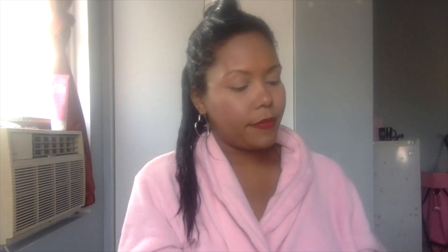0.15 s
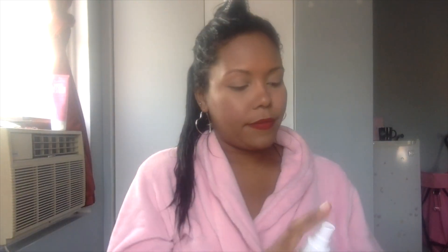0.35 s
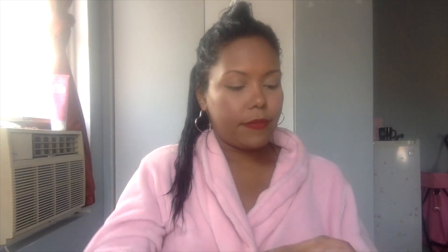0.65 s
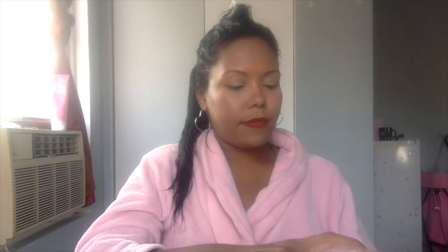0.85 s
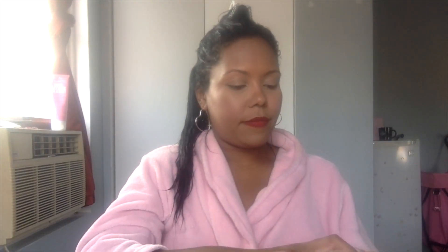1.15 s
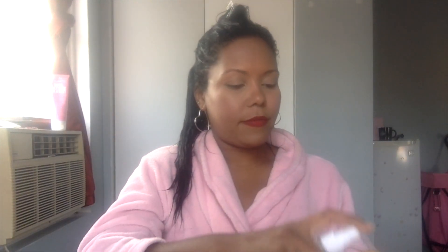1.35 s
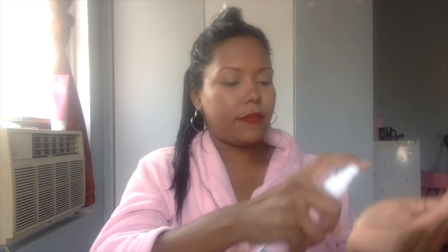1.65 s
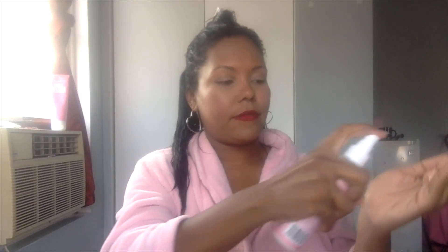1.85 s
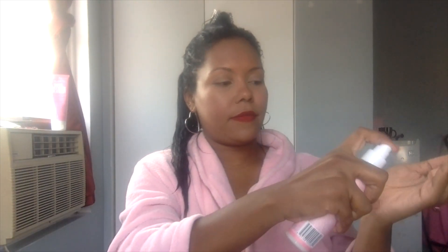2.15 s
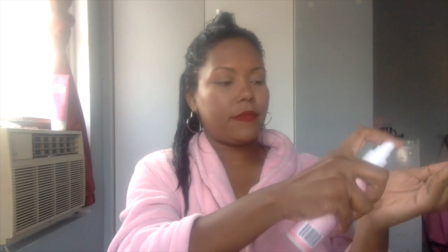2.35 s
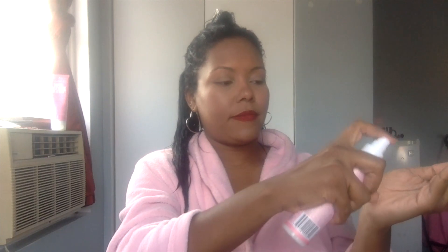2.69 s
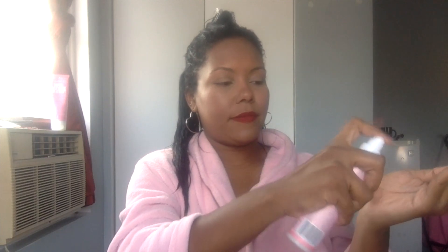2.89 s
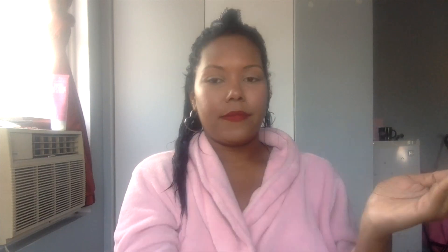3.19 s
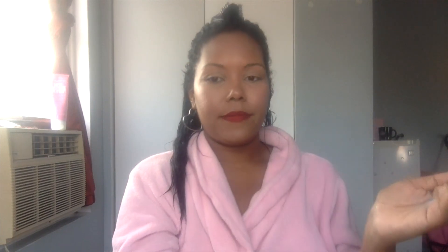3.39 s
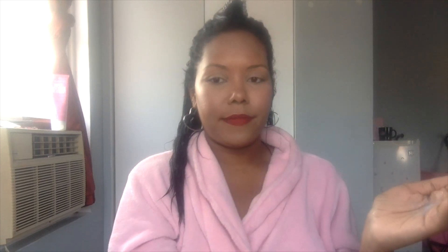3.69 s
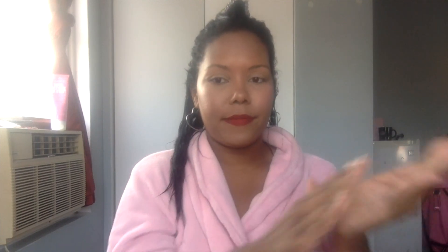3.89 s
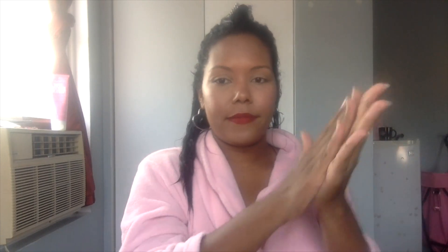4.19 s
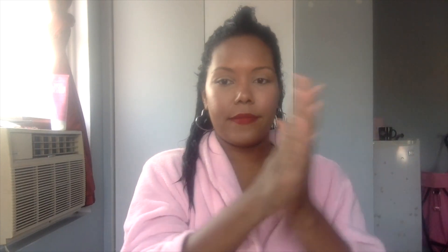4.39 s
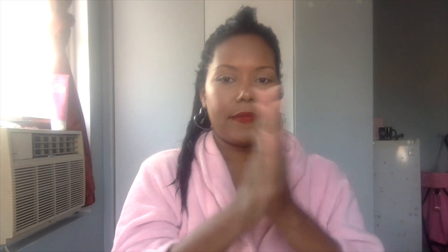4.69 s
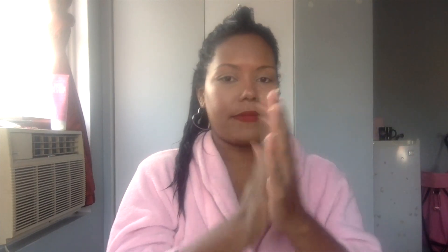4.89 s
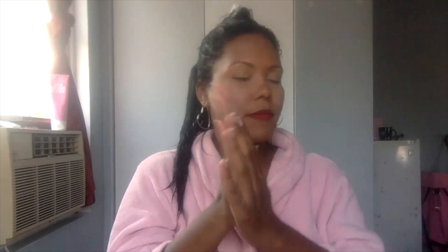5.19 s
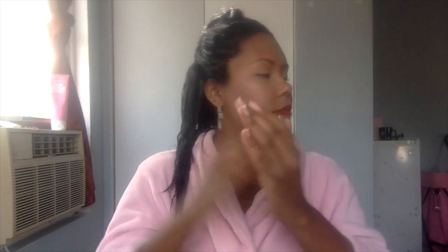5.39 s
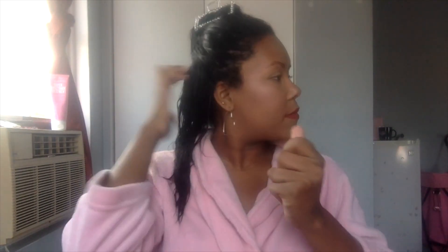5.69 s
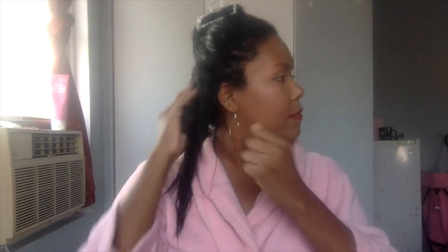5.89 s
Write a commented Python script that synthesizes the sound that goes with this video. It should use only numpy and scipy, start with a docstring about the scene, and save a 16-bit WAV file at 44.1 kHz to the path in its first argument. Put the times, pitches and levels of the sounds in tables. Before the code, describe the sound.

A plastic pump bottle clicks and bumps as it is picked up. It sprays three short, fizzy hisses into a palm, then is set down with a hard knock that rings through the table holding the microphone. Wet hands rub together with a squelch and two sharp smacks. Thin, high chirps like a small bird's continue throughout the small, quiet room, over a faint rush and hum.

```python
"""A pump bottle clicks and bumps as it is picked up in a small, quiet room. It sprays three short
hisses of air and liquid into a palm, then is set down hard, ringing the table that carries the
microphone. Wet hands rub and smack together, squeezing out liquid and popping pockets of air.
Thin falling chips, like those of a small bird, go on throughout over a faint rush and hum."""
import sys
import numpy as np
from scipy import signal
from scipy.fft import rfft, irfft, next_fast_len
from scipy.io import wavfile
from scipy.ndimage import uniform_filter1d, map_coordinates

SR = 44100
rng = np.random.default_rng(int(sys.argv[2]) if len(sys.argv) > 2 else 0)


def store_pcm(level_fs):
    """Save levels as 16-bit WAV."""
    pcm = np.round(np.clip(level_fs, -1, 1) * 32767).astype(np.int16)
    wavfile.write(sys.argv[1], SR, np.atleast_2d(pcm).T)


N = 266805
TIME = np.arange(N) / SR
AGE = np.arange(SR // 2) / SR  # seconds since an event began

# The room's echo. Each row: frequency in Hz, seconds to fade 60 dB before `linger` scales them.
ROOM_DECAY = [(100, 0.37), (400, 0.2), (1300, 0.32), (3500, 0.33), (7000, 0.39), (11000, 0.18),
              (15000, 0.17)]
# Echoes off near surfaces. Each row: delay in seconds, level in dB.
WALL_ECHOES = [(.0025, -14), (.0086, -20.5), (0.0117, -10.5), (0.028, -16)]

# The tone colours of the noises. Each row: frequency in Hz, relative level in dB.
AIR_COLOUR = [(15, -72), (25, -42.5), (64, -22.5), (74, -23), (97, -3.5), (137, -19.5), (206, -15),
              (317, -9), (354, -18), (775, -21.5), (988, -15.5), (1520, -20.5), (1940, -27), (2990, -24.5),
              (16000, -41)]  # the quiet room
RUMBLE_COLOUR = [(25, -30), (60, -12.5), (100, 13.5), (150, 0), (220, -32), (330, 7.5), (800, -31),
                 (4000, -84)]  # dull rumbles through the table
SKIN_COLOUR = [(400, -25), (1900, -16), (3000, 0.5), (4200, -1), (6000, 3), (8500, -5.5), (10500, -22.5),
               (15000, -29)]  # sliding skin
SQUELCH_COLOUR = [(250, -27), (600, 0.5), (1000, 6.5), (1700, -5), (2800, 3.5), (4200, 0.5), (5600, -16),
                  (8000, -8), (11500, -25), (14500, -29)]  # squeezed liquid
CRACK_COLOUR = [(60, -18.5), (300, 6), (1000, 0), (1800, -11), (2800, -5), (4200, -10.5), (5300, -16),
                (9000, -21), (15000, -31.5)]  # the bottle hitting the table
FIZZ_COLOUR = [(800, -63.5), (3000, -21.5), (5200, -14.5), (7000, 4), (10000, -2.5), (13000, -6),
               (15500, -4.5)]  # droplets at the nozzle
JET_COLOUR = [(300, -59), (900, -13.5), (1800, -14), (2700, -1), (4500, 3.5), (6000, -6.5), (9000, -17)]  # mist meeting the palm
SPIT_COLOUR = [(1000, -83.5), (2200, -65), (3000, -0.5), (4200, -33), (7300, 4.5), (8700, -4), (11500, 1.5),
               (14300, 0.5), (16000, -1)]  # the nozzle spitting

# Clear chips. Each row: start in seconds, peak in dB, pitch partway down in Hz, rough length in seconds.
CLEAR_CHIPS = [(0.1485, -37.5, 5110, 0.016), (0.3725, -37.5, 4910, 0.011), (0.6632, -50, 6240, 0.014),
               (1.273, -42, 4740, 0.019), (1.469, -38, 6340, 0.013), (1.5717, -37.5, 6280, 0.015),
               (1.7817, -45, 6020, 0.016), (1.8778, -33.5, 6020, 0.011), (2.385, -29, 5800, 0.016),
               (2.5397, -23.5, 5830, 0.01), (2.615, -28, 6230, 0.017), (2.747, -26, 5810, 0.016),
               (2.9831, -28.5, 5940, 0.013), (3.074, -28.5, 6020, 0.014), (3.2265, -30.5, 5540, 0.016),
               (3.3738, -32.5, 5830, 0.0095), (3.56, -28, 6060, 0.014), (3.7193, -32.5, 5590, 0.011),
               (3.788, -24.5, 6360, 0.013), (3.813, -39, 6190, 0.01), (3.8656, -37, 5620, 0.013),
               (3.91, -22.5, 6020, 0.015), (4.0127, -37.5, 5160, 0.016), (4.0543, -33, 5330, 0.014),
               (4.187, -32, 5970, 0.012), (4.2672, -29.5, 6780, 0.011), (4.349, -43, 5410, 0.014),
               (4.4017, -30, 6010, 0.02), (4.734, -27.5, 6610, 0.017), (4.9875, -31, 6290, 0.02),
               (5.0797, -30, 6830, 0.011), (5.221, -31, 6010, 0.015), (5.373, -43, 5570, 0.011),
               (5.442, -24, 6480, 0.012), (5.5593, -28, 6337, 0.013), (5.8684, -47, 5660, 0.011),
               (5.939, -39, 6540, 0.0096)]
# A thin held note. Each row: time in seconds, pitch in Hz, level in dB.
WHISTLE_PATH = [(3.48, 7750, -54), (3.6, 7350, -48), (3.636, 7450, -52), (3.654, 7520, -49),
                (3.68, 7410, -63), (3.735, 7540, -57)]

# Movements that swell and fade. Each row: middle in seconds, level in dB, half length in seconds.
TABLE_RUMBLES = [(.095, -30.5, 0.017), (.13, -36, 0.035), (1.2, -72.5, 0.2), (1.83, -63.5, 0.022),
                 (2.39, -63, 0.08)]  # the bottle scrapes as it is lifted, then arms shift faintly
SKIN_RUBS = [(.105, -55, 0.045), (4.09, -62, 0.086), (4.44, -43, 0.034), (4.98, -45.5, 0.02135),
             (5.13, -52.5, 0.05), (5.33, -64, 0.072)]  # skin slides on the bottle, then palm on palm
SQUEEZES = [(4.949, -29.5, 0.0034), (4.962, -32, 0.0069), (4.975, -32, 0.0063), (4.99, -44, 0.025)]  # liquid is squeezed between the palms
# Air bursts from cupped palms. Each row: start in seconds, peak in dB, pitch factor, treble limit in Hz.
PALM_POPS = [(4.5784, -18, 0.99, 6945), (4.5813, 0, 1.003, 15000), (5.3471, -31.5, 1.145, 3120)]
# Sharp clicks. Each row: start in seconds, peak in dB, centre frequency in Hz, width in octaves.
PALM_SMACKS = [(4.8628, -0.5, 3940, 0.61), (4.947, -22.5, 2780, 0.21), (4.973, -17.5, 2680, 0.55),
               (5.177, -40.5, 990, .7), (5.279, -31, 3220, .11), (5.281, -26.5, 2370, 0.61)]  # wet palms part and smack
PLASTIC_CLICKS = [(.0722, -18, 4600, 0.2), (.0725, -25, 9440, 0.54), (1.048, -45.5, 1330, 0.8),
                  (1.06, -50.5, 3100, 0.11), (1.311, -38.5, 6900, 0.22), (1.339, -33.5, 1760, 0.52),
                  (2.03, -45, 3100, .12), (2.044, -28.5, 3076, 0.077), (2.466, -47, 8900, 0.44),
                  (2.663, -38, 3060, 0.047), (2.671, -45, 8340, .28), (2.7035, -24.5, 4800, 0.11),
                  (3.104, -34, 8333, 0.3)]  # the bottle and its plunger

# Ringing tones. Each row: frequency in Hz, relative level in dB, seconds to fade 60 dB.
CUP_TONES = [(1010, -19, 0.006), (1301, -3.5, 0.021), (2615, -7, 0.014), (3195, -1, 0.014),
             (3533, -0.5, 0.022), (4250, -2.5, 0.0075), (6420, 1.5, 0.00442), (7240, -1, 0.014),
             (7780, -12, 0.0225), (8630, -7, 0.0076), (10000, -17, .007), (12380, -6.5, 0.0041)]  # air between the palms, before each pop's pitch factor
TABLE_TONES = [(99.8, -12, 0.094), (132.1, -12, 0.26), (187.4, -7.5, 0.12), (271.7, -4.5, 0.09),
               (354, -3, 0.062), (391.4, -6, 0.11), (593, -8.5, 0.043), (841.7, -8.5, 0.061),
               (1015, -20, 0.19), (1290, -20.5, 0.13), (2633, -23.5, 0.18), (2763, -24, 0.083)]  # the table top
# The bottle meets the table. Each row: start in seconds, thud in dB, crack in dB, treble limit in Hz.
BOTTLE_KNOCKS = [(0.073, -28, -44, 397), (0.086, -27, -53, 150), (0.0969, -27.5, -25.5, 605),
                 (0.1006, -21, -20.5, 570), (3.4084, -15.5, -6, 14000), (3.4103, 1.5, -11, 2400)]

# The nozzle's small hollows. Each row: frequency in Hz, width in Hz, boost or cut in dB.
NOZZLE_HOLLOWS = [(4900, 380, -3), (7180, 1000, 4), (8740, 490, -0.5), (9960, 520, 11), (12260, 600, 6),
                  (13400, 650, -10), (14200, 460, 9), (15041, 500, 10.5)]
# Spits of air and liquid. Each row: start in seconds, level in dB, seconds to fade 60 dB.
NOZZLE_SPITS = [(1.128, -31.5, 0.052), (2.0715, -19.5, 0.0068), (2.0831, -18, 0.019), (2.1256, -23, 0.023),
                (2.1781, -20.5, 0.047), (2.2271, -20.5, 0.018), (2.7026, -13, 0.018), (2.777, -17, 0.0026)]
# Pushes of the pump. Each row: start, length and rise time in seconds, fizz level and full jet level
# in dB, seconds the jet takes to build.
PUMP_STROKES = [(1.084, 0.15, 0.052, -37.5, -37, 0.083), (2.067, .19, 0.0093, -39.5, -51, 0.15),
                (2.704, 0.16, 0.0025, -39.5, -49, 0.036)]

AIR_DB, HUM_HZ, HUM_DB = -53.5, 85.6, -68  # levels before the noise suppressor
SUPPRESS_DB, OPEN_ABOVE_DB, OPEN_RANGE_DB = 12.5, -55, 20.5  # its depth; the treble levels that open it
OPEN_S, CLOSE_S = 0.1, 0.25
CHIP_ATTACK_S, CHIP_TAIL_DB = 0.0017, -26.5
CHIP_BASE_HZ, CHIP_START, CHIP_FALL = 4340, 1.238, 0.59  # scale on height above base; share lost per length
FAINT_CHIPS_PER_S, FAINT_CHIP_DB, FAINT_CHIP_HZ, FAINT_CHIP_S = 3, -50, 5600, 0.011
RUB_GRAIN_DB = 3
FIZZ_SAG_DB_PER_S, JET_BUILD_DB, RELEASE_DB_PER_S = 30, 24, 620
MIC_TOP_HZ = 16150


def amp(db):
    """Turn decibels into a gain."""
    return 10 ** (np.asarray(db) / 20)


def unit(x):
    """Scale x to an average (rms) level of 1."""
    return x / np.sqrt(np.mean(x ** 2) + 1e-20)


def along(points, hz):
    """Read between (Hz, value) points on a log frequency axis."""
    freqs, values = np.transpose(points)
    return np.interp(np.log(hz + 1), np.log(freqs + 1), values)


def add(track, start, sound):
    """Mix a sound into the track at a start time in seconds."""
    part = track[round(start * SR):][:len(sound)]
    part += sound[:len(part)]


def filtered(x, response):
    """Give each frequency in x the gain that response returns for it."""
    size = next_fast_len(len(x) + 8192)
    return irfft(rfft(x, size) * response(np.fft.rfftfreq(size, 1 / SR)), size)[:len(x)]


def high_pass(x, hz):
    """Turn down what lies below hz."""
    return signal.sosfilt(signal.butter(2, hz, "high", fs=SR, output="sos"), x)


def low_pass(x, hz):
    """Turn down what lies above hz."""
    return signal.sosfilt(signal.butter(2, min(hz, SR / 2 - 1), fs=SR, output="sos"), x)


def noise(colour, size=N):
    """Noise with the given tone colour, at level 1."""
    return unit(filtered(rng.standard_normal(size), lambda hz: amp(along(colour, hz))))


def wobble(rate):
    """A smooth curve through `rate` random points a second."""
    return map_coordinates(rng.standard_normal(int(N * rate / SR) + 4), [TIME * rate])


def swells(rows):
    """Smooth rises and falls in level, one for each row."""
    return sum(amp(db) * np.exp(-((TIME - middle) / half) ** 2) for middle, db, half in rows)


def fade(t60):
    """A level that drops 60 dB in t60 seconds."""
    return amp(-60 * AGE / t60)


def ring(tones, scatter_db):
    """Fading tones, struck at slightly new strengths each time."""
    return sum((-1) ** k * amp(db + scatter_db * rng.normal()) * fade(t60) * np.sin(2 * np.pi * hz * AGE)
               for k, (hz, db, t60) in enumerate(tones))


def in_room(x, wet_db, linger=1):
    """Add the room's echo, where each frequency dies at its own speed; linger scales its length."""
    hz, t, spectrum = signal.stft(rng.standard_normal(len(AGE)), SR, nperseg=256)
    t60 = linger * along(ROOM_DECAY, hz)[:, None]
    tail = signal.istft(spectrum * amp(-60 * t / t60), SR, nperseg=256)[1]
    tail = np.pad(tail / np.linalg.norm(tail), (SR // 400, 0))
    return x + amp(wet_db) * signal.fftconvolve(x, tail)[:len(x)]


def walls(x):
    """Near surfaces throw the sound back a moment later."""
    out = x.copy()
    for delay, db in WALL_ECHOES:
        add(out, delay, amp(db) * x)
    return out


def room_air():
    """A faint steady rush with a wavering low hum."""
    hum = amp(HUM_DB + 1.6 * wobble(8.2)) * np.sin(2 * np.pi * HUM_HZ * TIME + 3.6 * wobble(5.7))
    return amp(AIR_DB) * noise(AIR_COLOUR) + hum


def suppressor(x):
    """A noise suppressor's gain for the background: bright sound opens it, then it slowly closes."""
    treble_power = uniform_filter1d(high_pass(x, hz=6380) ** 2, size=SR // 50)
    treble_db = 10 * np.log10(np.abs(treble_power) + 1e-12)
    active = np.clip((treble_db - OPEN_ABOVE_DB) / OPEN_RANGE_DB, 0, 1)
    recently_active_s = signal.lfilter([1 / SR], [1, -np.exp(-1 / (CLOSE_S * SR))], active)
    return amp(-SUPPRESS_DB * np.exp(-recently_active_s / OPEN_S))


def chip(hz, length):
    """A pure tone that starts sharply and slides down; the higher it is, the faster it falls."""
    progress = AGE / length
    pitch = CHIP_BASE_HZ + (hz - CHIP_BASE_HZ) * CHIP_START * (1 - CHIP_FALL * np.minimum(progress, 2))
    decay = np.exp(-(progress / 0.76) ** 3) + amp(CHIP_TAIL_DB) * np.exp(-(progress / 1.6) ** 4)
    flutter = amp(2.5 * np.sin(2 * np.pi * (rng.uniform(80, 200) * AGE + rng.random())))
    level = (1 - np.exp(-(AGE / CHIP_ATTACK_S) ** 2)) * decay * flutter
    return level / level.max() * np.sin(2 * np.pi * np.cumsum(pitch) / SR)


def faint_chips():
    """Weak chips at random times, just above the room's rush."""
    out = np.zeros(N)
    for k, (when, loud, high) in enumerate(rng.random((int(FAINT_CHIPS_PER_S * N / SR), 3))):
        db = FAINT_CHIP_DB + 10 * (loud - 0.5)
        hz = FAINT_CHIP_HZ + 1600 * (high - 0.5)
        add(out, (k + when) / FAINT_CHIPS_PER_S, amp(db) * chip(hz, FAINT_CHIP_S))
    return out


def bird():
    """Clear chips and one thin, wavering whistle, like a small bird's."""
    chips = np.zeros(N)
    for start, db, hz, length in CLEAR_CHIPS:
        add(chips, start, amp(db) * chip(hz, length))
    times, hz, db = np.transpose(WHISTLE_PATH)
    pitch = np.interp(TIME, times, hz) + 70 * wobble(380)
    level = amp(np.interp(TIME, times, db, left=-120, right=-120) + 5.1 * wobble(92))
    whistle = level * np.sin(2 * np.pi * np.cumsum(pitch) / SR)
    return in_room(chips + whistle, wet_db=-13.5, linger=0.47)


def table_rumble():
    """Dull rumbles through the table: the bottle scrapes as it is lifted, then arms shift faintly."""
    return in_room(swells(TABLE_RUMBLES) * noise(RUMBLE_COLOUR), wet_db=-14)


def snap(hz, octaves):
    """A click of peak 1, made of one smooth hump of frequencies around hz."""
    size = len(AGE)
    away = np.log2((np.fft.rfftfreq(size, 1 / SR) + 1) / hz) / octaves
    hump = np.exp(-np.abs(away) ** 3.3 / 2) + amp(-70)
    # Keeping half the cepstrum (the log spectrum turned into time) packs the energy at the start.
    cepstrum = irfft(np.log(hump), size)
    click = irfft(np.exp(rfft(2 * cepstrum[:size // 2], size)), size)
    return click / np.abs(click).max()


def snaps(rows, wet_db):
    """Short clicks of plastic or wet skin, each with its own colour and echo."""
    out = np.zeros(N)
    for start, db, hz, octaves in rows:
        add(out, start, in_room(amp(db) * snap(hz, octaves), wet_db, linger=0.64))
    return out


def palms():
    """Wet skin swishes, films of liquid crackle, and trapped air pops in the hollow of the hands."""
    swish = swells(SKIN_RUBS) * unit(amp(RUB_GRAIN_DB * wobble(400)) * noise(SKIN_COLOUR))
    bubbles = rng.standard_normal(N) * amp(4.6 * wobble(1200))  # a few bursts stand far above the rest
    crackle = swells(SQUEEZES) * unit(filtered(bubbles, lambda hz: amp(along(SQUELCH_COLOUR, hz))))
    pops = np.zeros(N)
    for start, db, pitch, soft_hz in PALM_POPS:
        tones = [(hz * pitch, level, t60) for hz, level, t60 in CUP_TONES]
        pop = low_pass(ring(tones, scatter_db=0.5), soft_hz)
        pop = amp(db) * pop / np.abs(pop).max()
        add(pops, start, in_room(walls(pop), wet_db=-0.5, linger=0.92))
    pops = high_pass(high_pass(pops, hz=551.8), hz=404)
    return in_room(swish + crackle, wet_db=-9.5, linger=0.6) + pops


def knocks():
    """The bottle cracks against the table and rings its top; soft contacts lose their treble."""
    out = np.zeros(N)
    for start, thud_db, crack_db, soft_hz in BOTTLE_KNOCKS:
        thud = amp(thud_db) * ring(TABLE_TONES, scatter_db=1.56)
        crack = amp(crack_db) * fade(t60=0.0715) * noise(CRACK_COLOUR, size=len(AGE))
        add(out, start, in_room(low_pass(thud + crack, soft_hz), wet_db=-10.5, linger=0.82))
    return out


def stroke(start, length, attack, fizz_db, jet_db, build):
    """Gains for one push: the fizz sags, the jet builds, and both die as the plunger bottoms out."""
    age = np.maximum(TIME - start, 0)
    opening = np.minimum(age / attack, 1) ** 2
    closing = amp(-RELEASE_DB_PER_S * np.maximum(age - length, 0))
    sagging_db = fizz_db - FIZZ_SAG_DB_PER_S * age
    building_db = jet_db - JET_BUILD_DB * np.maximum(1 - age / build, 0)
    return opening * closing * amp([sagging_db, building_db])


def spray():
    """Each push starts as a bright, spitting fizz; as the pressure falls, the wetter jet comes up."""
    fizz_gain, jet_gain = sum(stroke(*row) for row in PUMP_STROKES)
    sputter = amp(2.1 * wobble(150) + 1.4 * wobble(1500))  # the liquid breaks up unevenly
    hollows = lambda f: amp(sum(db / (1 + (2 * (f - hz) / width) ** 2) for hz, width, db in NOZZLE_HOLLOWS))
    hiss = unit(filtered(noise(FIZZ_COLOUR), hollows))
    fizz = in_room(fizz_gain * sputter * hiss, wet_db=-20, linger=0.75)
    jet = in_room(jet_gain * sputter * noise(JET_COLOUR), wet_db=-11)
    spits = np.zeros(N)
    for start, db, t60 in NOZZLE_SPITS:
        add(spits, start, amp(db) * fade(t60) * noise(SPIT_COLOUR, size=len(AGE)))
    return fizz + jet + in_room(high_pass(spits, hz=3500), wet_db=-14.5, linger=0.58)


def scene():
    """Everything at one microphone; the room's rush comes up behind each bright sound."""
    bottle = spray() + knocks() + snaps(PLASTIC_CLICKS, wet_db=-10.5)
    hands = palms() + snaps(PALM_SMACKS, wet_db=-3)
    rumble = table_rumble()
    background = room_air() + faint_chips()
    near = bottle + hands + rumble + bird()
    return (near + background * suppressor(near + background))[None]


def record(dry):
    """The microphone drops the deep bass, overloads on the hardest blows and cuts the top treble."""
    overloaded = np.clip(high_pass(dry[0], hz=60), -1, 1)
    return filtered(overloaded, lambda hz: np.clip(hz / 60, 0, 1) / (1 + (hz / MIC_TOP_HZ) ** 120))[None]


dry = scene()
out = record(dry)
store_pcm(out)
```